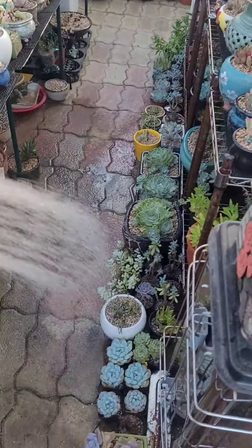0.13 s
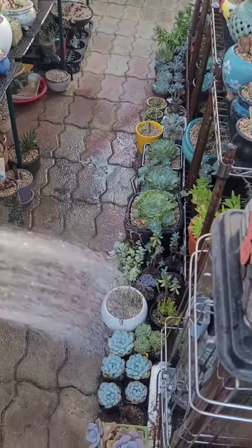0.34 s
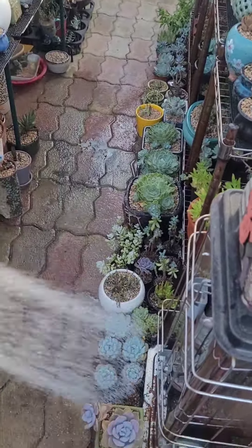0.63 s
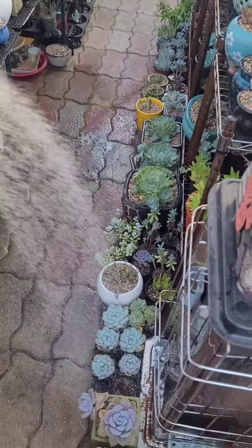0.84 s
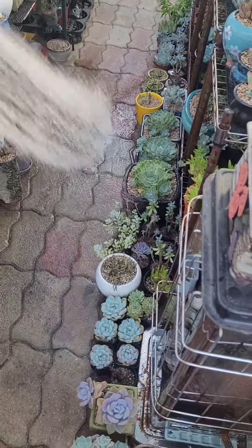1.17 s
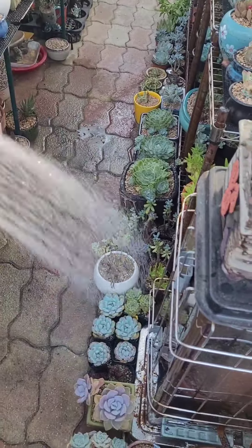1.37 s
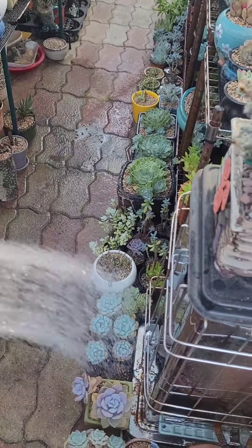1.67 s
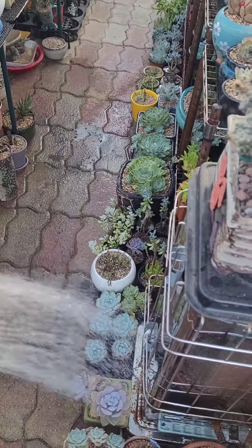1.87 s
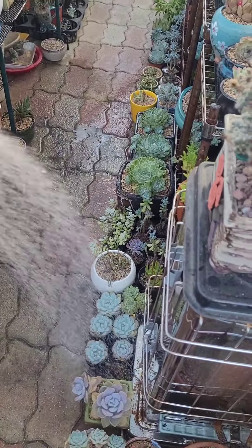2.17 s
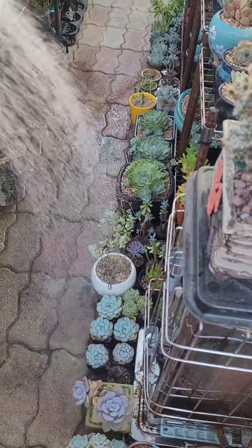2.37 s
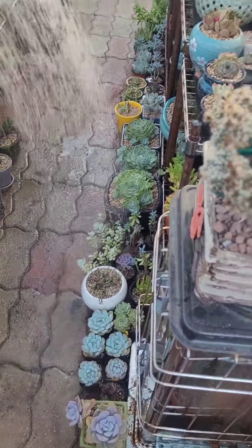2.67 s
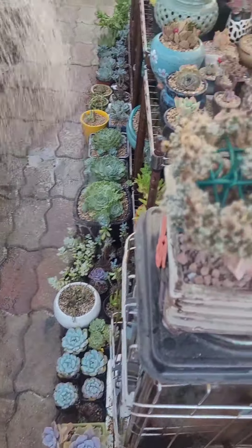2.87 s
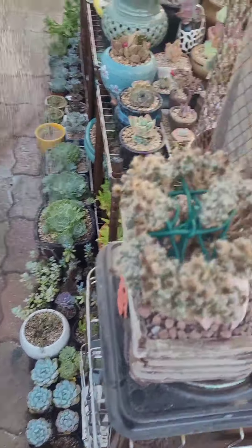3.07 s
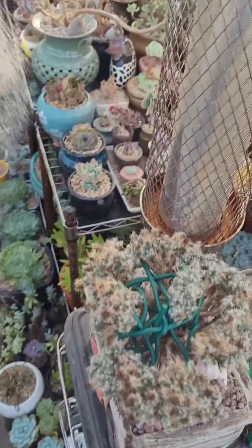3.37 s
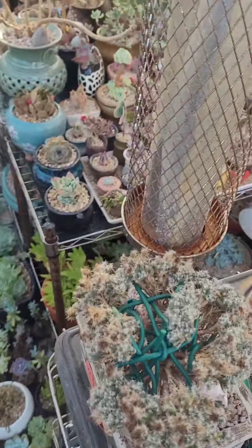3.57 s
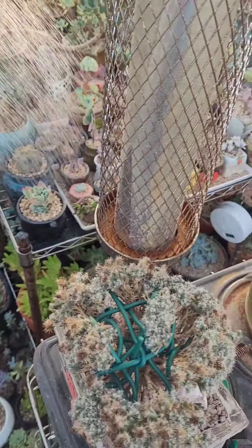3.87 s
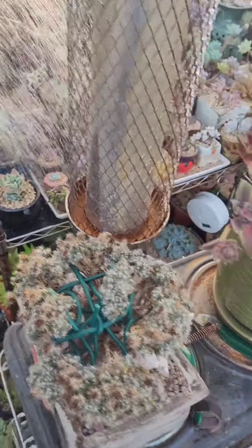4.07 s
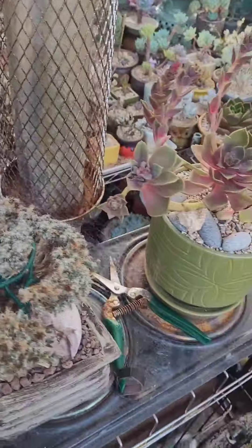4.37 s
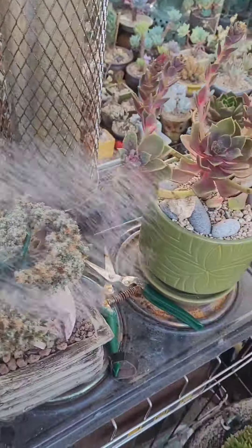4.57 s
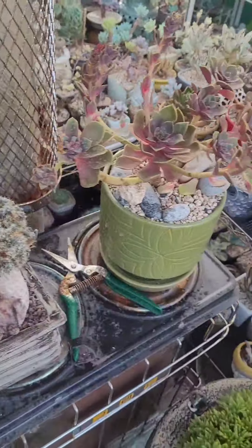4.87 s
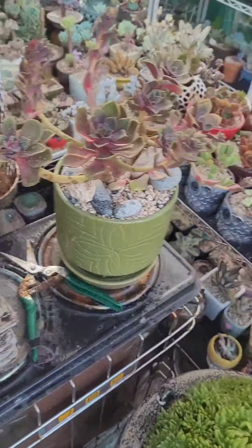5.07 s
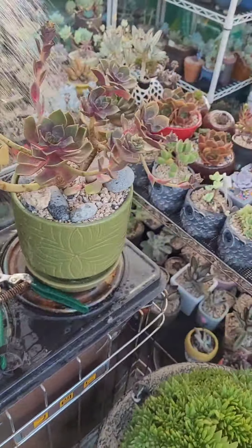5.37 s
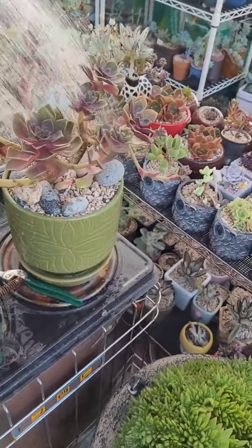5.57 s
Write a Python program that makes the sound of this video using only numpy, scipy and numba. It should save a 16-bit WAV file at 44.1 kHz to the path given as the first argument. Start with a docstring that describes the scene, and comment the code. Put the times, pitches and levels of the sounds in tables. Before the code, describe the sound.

A fine water spray hisses from a hose over potted plants, with pattering drops, small taps and a few dull handling thumps.

```python
"""A yard with potted plants and paving, a hose rose sweeping fine water to and fro near a hand-held recorder.
The left port is open: it hears the nozzle hiss and fine drops with a phasey swish, heavier drops on
soil and pots, small taps, knocks and shuffles, and a far hum.
The right port is covered by a finger: it hears the low tremor and jolts of the grip, skin rubbing
and a faint leak of hiss."""
import sys
import numpy as np
from scipy import signal
from scipy.fft import rfft, irfft, next_fast_len
from scipy.io import wavfile
from scipy.ndimage import uniform_filter1d
from numba import njit

SR = 44100
rng = np.random.default_rng(int(sys.argv[2]) if len(sys.argv) > 2 else 0)


def inscribe(sig):
    """Save sig as 16-bit PCM at rate SR to the path in sys.argv[1].

    A 1-D sig is mono; a 2-D sig holds one channel per row.
    Samples are clipped to [-1, 1] before scaling.
    """
    pcm = np.round(np.clip(np.atleast_2d(sig).T, -1, 1) * 32767)
    wavfile.write(sys.argv[1], SR, pcm.astype(np.int16))


N = 251811
PORT_GAIN_DB = 6.5   # added to the listed levels of the water, the taps and the tremor


def amp(db):
    """dB to gain."""
    return 10 ** (np.asarray(db) / 20)


def rms_one(x):
    """Scale to rms 1."""
    return x / np.sqrt(np.mean(x ** 2) + 1e-20)


def in_time(rows):
    """The columns after t/s, interpolated sample by sample."""
    s, *columns = np.transpose(rows)
    return [np.interp(np.arange(N) / SR, s, c) for c in columns]


def add(track, s, burst):
    """Mix a burst in at s seconds."""
    at = round(s * SR)
    track[at:at + len(burst)] += burst[:N - at]


def drift(hz):
    """Random wander of rms 1: coarse noise twice through a one-pole low-pass."""
    step, settle = 20, 3000
    r = np.exp(-2 * np.pi * step * hz / SR)
    slow = signal.lfilter([1], [1, -2 * r, r * r], rng.standard_normal(N // step + settle + 2))[settle:]
    return np.interp(np.arange(N) / step, np.arange(len(slow)), rms_one(slow))


def shaped_noise(points):
    """Steady noise whose spectrum follows points of f/Hz, density/dB."""
    size = next_fast_len(N)
    hz = np.arange(1, size // 2 + 2) * SR / size
    point_hz, point_db = np.transpose(points)
    density_db = np.interp(np.log(hz), np.log(point_hz), point_db, left=-160, right=-160)
    return irfft(rfft(rng.standard_normal(size)) * amp(density_db) * np.sqrt(SR / 2), size)[:N]


def impacts(per_s, spread_db):
    """Random impulses of uneven size and sign."""
    out, hit = np.full(N, 1e-18), rng.random(N) < per_s / SR
    size_db = spread_db * np.minimum(rng.exponential(1, hit.sum()), 4)
    out[hit] = amp(size_db) * rng.standard_normal(hit.sum())
    return out


@njit
def swept(x, pull, r):
    """Two-pole resonance whose centre moves sample by sample; pull = 2 r cos(2 pi hz / SR)."""
    y = np.zeros(len(x))
    for i in range(2, len(x)):
        y[i] = x[i] - x[i - 2] + pull[i] * y[i - 1] - r * r * y[i - 2]
    return y


def resonate(modes, per_s, spread_db, patchy_db):
    """Impacts ring each mode (f/Hz, width/Hz, level/dB), which swells by itself; the sum has rms 1."""
    out = 0
    for hz, width, db in modes:
        r = np.exp(-np.pi * width * 1.5 / SR)   # 1.5 offsets the narrowing by two passes
        pull = 2 * r * np.cos(2 * np.pi * hz / SR) * np.ones(N)
        band = swept(swept(impacts(per_s, spread_db), pull, r), pull, r)
        out = out + rms_one(band) * amp(db + patchy_db * (drift(3.5) + 0.8 * drift(9.2)))
    return rms_one(out)


def with_delay(x, lag_ms, share):
    """Sound plus one slightly duller delayed copy, power kept."""
    late = np.interp(np.arange(N) - np.abs(lag_ms) * SR / 1000, np.arange(N), x)
    return (x + share * late) / np.sqrt(1 + share ** 2)


def yard_hum():
    """Far, steady hum at the open port."""
    # hum spectrum: f/Hz, density/dB
    hum = [(20, -108), (40, -100), (57, -85), (80, -105), (110, -100), (200, -102), (600, -104),
           (1000, -115)]
    return shaped_noise(hum)


def shuffles():
    """Feet and hose scuff over the paving; each drag swells and fades smoothly."""
    # drags: middle t/s, length/s, level/dB, f/Hz
    drags = [(.25, 0.48, -68, 298), (0.583, 0.76, -65, 343), (1.653, 0.32, -70, 200),
             (2.103, 0.74, -71, 250), (2.738, 0.46, -69, 312), (2.975, 0.14, -60, 200),
             (3.31, 0.6, -59, 290), (3.9, 0.24, -59.5, 300), (4.331, 0.14, -55, 190),
             (4.483, 0.34, -59.5, 332), (4.815, 0.56, -63.5, 333), (5.142, 0.16, -60, 290),
             (5.38, 0.56, -62, 366)]
    level = np.full(N, amp(-79.5))   # floor between drags
    for s, length, db, _ in drags:
        add(level, s - length / 2, amp(db) * np.hanning(round(length * SR)))
    scuff_hz, = in_time([(s, hz) for s, _, _, hz in drags])
    return level * resonate([(scuff_hz, 156, 0)], per_s=1500, spread_db=3.0, patchy_db=2.0)


def knocks():
    """Pots and feet knock dully: a soft onset, then one dying tone."""
    # knocks: t/s, level/dB, f/Hz, t60/s
    bumps = [(2.925, -51, 198, 0.32), (2.93, -40, 640, 0.037), (2.98, -46, 640, 0.047),
             (3.372, -43, 614, 0.093), (3.88, -49, 320, 0.13), (4.315, -48, 206, 0.21),
             (4.72, -53.5, 644, 0.63), (4.79, -44, 768, 0.14), (5.11, -55, 267, 0.077),
             (5.115, -46.5, 770, 0.12)]
    out, t = np.zeros(N), np.arange(SR // 3) / SR
    for s, db, hz, t60 in bumps:
        add(out, s, amp(db - 60 * t / t60) * (1 - np.exp(-t / 0.006)) * np.sin(2 * np.pi * hz * t))
    return out


def taps():
    """Sharp taps near the open port, and at 4.22 s the spatter of a spurt of water: a crack spread round the
    pitch, a short ring, a little rattle."""
    # taps, and the spatter of a spurt at 4.22 s: t/s, level/dB, f/Hz, t60/s
    strikes = [(0.015, -46, 1710, 0.04), (0.037, -46.5, 2920, 0.049), (0.13, -51, 1100, 0.046),
               (0.191, -49, 1310, 0.05), (0.227, -49, 1320, 0.039), (0.308, -42, 1900, 0.074),
               (0.518, -48.5, 2900, 0.04), (1.99, -50, 3080, 0.24), (2.9, -45, 1920, 0.036),
               (3.015, -51, 1720, 0.022), (3.315, -53, 1500, .025), (3.376, -54, 1140, .05),
               (3.828, -51.5, 2700, 0.3), (4.013, -40.5, 1730, 0.11), (4.058, -51.5, 1300, 0.028),
               (4.154, -40, 2100, 0.018), (4.22, -43, 3100, 0.055), (4.221, -45, 5200, .05),
               (4.348, -45, 2960, .03)]
    out, t = np.zeros(N), np.arange(SR // 8) / SR
    for s, db, hz, t60 in strikes:
        band = signal.butter(2, [hz * 0.73, hz * 2.05], "band", fs=SR, output="sos")
        crack = 12 * signal.sosfilt(band, np.exp(-t / 0.00004))
        ring = 0.47 * np.sin(2 * np.pi * hz * t)
        rattle = (1.4 + np.exp(-t / 0.0012)) * signal.sosfilt(band, rng.standard_normal(len(t)))
        add(out, s, amp(db - 60 * t / t60) * (crack + ring + rattle))
    return out


def grip_jolts():
    """Jolts ring the cavity under the finger, stiff at first and so falling in pitch; slips blip."""
    # jolts: t/s, level/dB, final f/Hz, rise/s, t60/s, direction
    jolts = [(0.425, -5.5, 60.3, 0.0026, 0.086, -1), (2.978, -18.5, 57.4, 0.02, 0.097, 1),
             (3.142, -24, 55.6, 0.0073, 0.19, -1), (3.224, -21.5, 57.3, 0.0061, 0.14, 1),
             (3.391, -17, 59.6, 0.006, 0.099, -1), (3.442, -16, 64, 0.0074, 0.042, -1),
             (4.1, -21, 44.1, 0.049, 0.24, 1), (4.655, -13.5, 48.4, 0.0065, 0.076, 1),
             (5.605, -17, 48.5, 0.0048, 0.1, 1)]
    # the fingertip slips on the port: t/s, level/dB
    slips = [(0.294, -41.5), (0.334, -44), (0.359, -42), (0.387, -47), (3.242, -43.5), (4.477, -42),
             (4.669, -39.5), (5.634, -36.5)]
    out, t = np.zeros(N), np.arange(SR // 3) / SR
    for s, db, hz, rise, t60, direction in jolts:
        cycles = hz * (t + 0.0047 * (1 - np.exp(-t / 0.0035)))
        envelope = amp(db - 60 * (t / t60) ** 2) * np.tanh((t / rise) ** 1.14)
        add(out, s, np.sign(direction) * envelope * np.sin(2 * np.pi * cycles))
    for s, db in slips:
        add(out, s, amp(db) * np.exp(-((t - .006) / 0.003) ** 2) * np.sin(2 * np.pi * 260 * t))
    return out


def covered_port():
    """Hand tremor pumps the cavity sealed by the finger, skin creeps in lumps, a little hiss leaks in."""
    # strength of the tremor: t/s, level/dB
    tremor_levels = [(0.0, -38), (0.3, -38.5), (0.62, -43), (1.06, -44.5), (2.94, -43.5), (3.83, -39),
                     (4.3, -40.5), (4.61, -43.5), (4.8, -40.5), (5.47, -45), (5.71, -42)]
    # spectra of tremor (relative), rubbing skin and leaking hiss: f/Hz, density/dB
    tremor_colour = [(12, -6), (20, -26), (37, 2), (59, 3), (74, -3.5), (92, -13.5), (129, -19),
                     (194, -34.5), (393, -46.5), (480, -66), (620, -86), (1060, -120)]
    rub_colour = [(100, -100), (135, -102), (250, -100.5), (430, -102), (520, -118)]
    leak_colour = [(450, -104), (700, -114), (2000, -119), (7500, -126), (10500, -116), (13500, -106),
                   (14800, -108), (15500, -120)]
    tremor_db, = in_time(tremor_levels)
    tremor = rms_one(shaped_noise(tremor_colour)) * amp(tremor_db + PORT_GAIN_DB + 2.62 * drift(12.3))
    rub = shaped_noise(rub_colour) * amp(0.87 * drift(8.4))
    leak = shaped_noise(leak_colour) * amp(0.94 * drift(4.7))
    return tremor + rub + leak


def heavy_drops():
    """Low patter: heavy drops hit the soil and drum in the hollow pots."""
    # strength of the patter: t/s, soil level/dB, pot level/dB
    levels = [(0.0, -57, -68), (0.13, -53.5, -65.5), (0.27, -61.5, -67), (0.44, -64.5, -84),
              (1.03, -67, -76.5), (1.21, -72.5, -87), (1.51, -64.5, -83), (1.69, -65, -77),
              (2.05, -64, -71.5), (2.18, -64.5, -71.5), (2.37, -70.5, -77.5), (2.91, -66, -76.5),
              (3.47, -69, -75), (3.62, -73, -80.5), (3.88, -67, -72), (4.02, -72, -76), (4.2, -70, -73),
              (4.37, -66, -66.5), (4.63, -66, -69), (4.88, -70, -70), (5.09, -65, -72),
              (5.34, -65.5, -67.5), (5.57, -74, -74), (5.71, -70, -80)]
    # resonances of soil and pots: f/Hz, width/Hz, relative level/dB
    soil_modes = [(1250, 450, -5), (1796, 540, -0.5)]
    pot_modes = [(620, 81, -6.5), (779, 86, -2), (945, 210, -0.5)]
    soil_db, pots_db = in_time(levels)
    soil = amp(soil_db) * resonate(soil_modes, per_s=3000, spread_db=2.5, patchy_db=3.5)
    pots = amp(pots_db) * resonate(pot_modes, per_s=900, spread_db=2.0, patchy_db=3.5)
    return soil + pots


def fine_drops():
    """Fine drops ring on leaves, paving and pot rims, mirrored by the nearest surface."""
    # drops landing: t/s, level on leaves and paving/dB, spatter against that/dB
    levels = [(0.0, -55.5, 2.5), (0.13, -52.5, 1), (0.89, -54.5, -1.5), (0.94, -58, 5), (1.24, -53, 3.5),
              (1.38, -55.5, 2.5), (1.6, -53, 1), (1.74, -49, -2.5), (1.79, -57.5, 2), (2.3, -58.5, 1.5),
              (2.42, -55, 5), (2.97, -53, 0), (3.23, -55.5, 1), (3.37, -51.5, -4.5), (3.59, -55.5, -2),
              (3.74, -50.5, -1.5), (3.86, -55.5, 3.5), (4.09, -50.5, -1), (4.68, -49, -0.5),
              (4.77, -53.5, 4), (4.86, -50, -2), (4.97, -51.5, 2), (5.07, -49.5, 0), (5.33, -52.5, -0.5),
              (5.71, -49.5, 1)]
    # what the spray hits: t/s, lower ring/Hz, upper ring/Hz, rims against leaves/dB, ring emphasis/dB
    aim = [(0, 3220, 5200, -0.5, 1.5), (.75, 3100, 5850, -1, 3), (1.2, 2870, 5770, -1, 0),
           (1.45, 3020, 5800, -3, 0.5), (1.72, 3040, 5770, 0, 3), (2.2, 3140, 5800, 2, 3),
           (2.36, 3120, 5700, 2, -3), (2.45, 2900, 4830, -0.5, -1.5), (3.15, 2820, 4650, -1, -1),
           (3.33, 3030, 5220, -0.5, 2), (3.7, 2860, 5000, -3.5, 1.5), (3.92, 2900, 4950, 3, 1),
           (4.08, 3450, 5000, 1.5, 1.5), (4.22, 2950, 5180, -0.5, 3), (4.8, 3110, 5130, 0, 2),
           (5.0, 3200, 5200, 0, 1.5), (5.12, 3500, 5200, -0.5, 2), (5.33, 3550, 4950, 1.5, 0),
           (5.46, 2660, 4940, -2.5, 1), (5.71, 2930, 5030, -4.5, 2.5)]
    # nearest reflection: t/s, lag/ms, share 0-1
    mirror = [(0, 0.32, 0), (1.75, 0.44, 0.13), (2.2, 0.3, 0.2), (2.4, 0.41, 0), (3.5, 0.63, 0.11),
              (4.25, 0.602, 0.42), (5.27, 0.61, 0.44), (5.5, 0.67, 0.18)]
    # resonances of leaves, rims and spatter: f/Hz, width/Hz, relative level/dB
    leaf_modes = [(2480, 620, -4), (3760, 730, -1.5)]
    rim_modes = [(4650, 940, -1)]
    spatter_modes = [(5870, 220, 1.5), (6610, 530, 2.2), (7770, 7400, 14)]
    leaves_db, spatter_db = in_time(levels)
    lower_hz, upper_hz, rims_db, ring_db = in_time(aim)
    lag_ms, share = in_time(mirror)
    sink_db = 10 * share + np.maximum(ring_db, 0)   # modes beside the rings give way to echo and rings
    leaves = [(lower_hz, 760, ring_db)] + [(hz, width, db - sink_db) for hz, width, db in leaf_modes]
    rims = [(upper_hz, 800, ring_db)] + [(hz, width, db - sink_db) for hz, width, db in rim_modes]
    patter = sum(amp(db) * resonate(modes, per_s=9000, spread_db=2.0, patchy_db=0.72)
                 for db, modes in [(0, leaves), (rims_db, rims), (spatter_db, spatter_modes)])
    return with_delay(amp(leaves_db) * patter, lag_ms, share)


def nozzle_hiss():
    """The rose, close to the microphone: dense droplets hiss in ridges that slide as it turns."""
    # hiss over the sweep: t/s, body level/dB, upper ridges against body/dB, mist against body/dB
    levels = [(0.0,-45,-5,-8), (0.06,-44,-3,-10), (0.35,-43,-4.5,-8), (0.48,-49,0.5,-4),
              (0.63,-46.5,-1.5,-7), (0.79,-48,-1,-4), (0.83,-44.5,-3,-6), (1.18,-44,-2.5,-7),
              (1.75,-43.5,-1.5,-8), (1.775,-51,2,-7), (2.16,-49,0,-5), (2.42,-42.5,-2.5,-6),
              (2.54,-41.5,-1.5,-12), (2.77,-42.5,-1,0), (3.1,-45.5,0,-2), (3.23,-48,-1.5,-2),
              (3.31,-45,-2,-6), (3.64,-48,0.5,-5.5), (3.8,-42.5,0,-8), (4.04,-41.5,-9.5,-8),
              (4.21,-44,-1.5,-12), (4.29,-44.5,-2,-4), (4.45,-47,0.5,-4), (4.76,-45.5,-2,-6),
              (4.82,-48,3,-6), (4.88,-46.5,-2,-8), (4.95,-49.5,5,-1), (5.29,-42,-5,-10), (5.6,-41,-1.5,-5),
              (5.71,-41.5,0,-7)]
    # ridge centres: t/s, main f/Hz, second f/Hz, third f/Hz
    ridges = [(0, 10400, 11700, 13500), (.4, 10240, 11900, 13700), (.6, 10550, 11800, 13500),
              (.82, 10100, 11900, 14000), (1.3, 10050, 12650, 14100), (1.7, 10500, 11500, 13400),
              (2.05, 10640, 12000, 13400), (2.4, 10030, 11540, 14100), (2.65, 10250, 12200, 13500),
              (2.9, 10120, 11200, 13000), (3.3, 10420, 12300, 13400), (3.8, 10230, 11870, 13200),
              (4.0, 10530, 12200, 12900), (4.18, 10950, 12800, 13600), (4.33, 9900, 12300, 13600),
              (4.5, 9800, 12160, 13400), (4.65, 10400, 12300, 14200), (4.78, 10950, 12500, 13300),
              (4.95, 9800, 11500, 13500), (5.17, 10500, 12500, 13400), (5.45, 10260, 11900, 12900),
              (5.71, 10800, 11700, 13600)]
    # lower shoulder of the hiss: t/s, f/Hz, level against the main ridge/dB
    shoulder = [(0, 9300, -9), (.36, 8750, -6.5), (.46, 8840, -0.5), (.78, 8860, -3), (.9, 8800, -10.5),
                (1.7, 8960, -4.5), (1.8, 9030, 1), (2.2, 8870, -2), (2.4, 8900, -12), (2.7, 8220, -6.5),
                (3.05, 8270, -4), (3.3, 8700, -4.5), (3.7, 8900, -4.5), (4.05, 9050, -5.5),
                (4.45, 8600, -12), (4.65, 8760, 1.5), (4.85, 8900, -13.5), (5.0, 8840, 0),
                (5.15, 8600, -11), (5.71, 9250, -1)]
    # band of the finest mist: f/Hz, width/Hz, relative level/dB
    mist = [(15200, 1200, 0)]
    body_db, upper_db, mist_db = in_time(levels)
    main_hz, second_hz, third_hz = in_time(ridges)
    shoulder_hz, shoulder_db = in_time(shoulder)
    body = [(main_hz, 950, 0), (shoulder_hz, 710, shoulder_db)]
    upper = [(second_hz, 680, 0), (third_hz, 700, -0.5)]
    return amp(body_db) * sum(amp(db) * resonate(modes, per_s=26000, spread_db=1.0, patchy_db=0.59)
                              for db, modes in [(0, body), (upper_db, upper), (mist_db, mist)])


def spray():
    """Hiss and fine drops sputter with the flow; short drifting delays give them a phasey swish."""
    # short delays of the swish: lag/ms, share 0-1
    delays = [(.62, .15), (.95, .22), (1.4, .2), (1.9, .18), (2.6, .16), (3.4, .14), (4.5, .12)]
    # wander of those lags, wider later on: t/s, spread/ms
    wander = [(0, 0.07), (3.6, 0.07), (4.2, 0.16), (5.3, 0.16), (5.71, 0.09)]
    # the flow falters or spurts for an instant: t/s, length/s, change/dB
    falters = [(2.24, .015, -3), (2.285, .015, -4), (2.335, .012, -3), (4.219, .009, 4.5), (4.31, .038, -3),
               (4.33, .018, -5), (4.348, .005, 2), (4.357, .032, -8.5)]
    water = nozzle_hiss() + fine_drops()
    wander_ms, = in_time(wander)
    for lag_ms, share in delays:
        water = with_delay(water, lag_ms + wander_ms * drift(1.18), share)
    flow_db = .65 * drift(25) + .6 * drift(150)
    for s, length, db in falters:
        add(flow_db, s, np.full(round(length * SR), float(db)))
    return water * amp(uniform_filter1d(flow_db, size=30))


def scene():
    """Left: the port open to the yard. Right: the port under the finger."""
    left = amp(PORT_GAIN_DB) * (spray() + heavy_drops() + taps()) + knocks() + shuffles() + yard_hum()
    right = grip_jolts() + covered_port()
    return np.array([left, right])


def record(dry):
    """The recorder cuts the top steeply."""
    cutoff_hz = 15760
    return signal.sosfilt(signal.ellip(14, .3, 70, cutoff_hz, fs=SR, output="sos"), dry)


dry = scene()
out = record(dry)
inscribe(out)
```